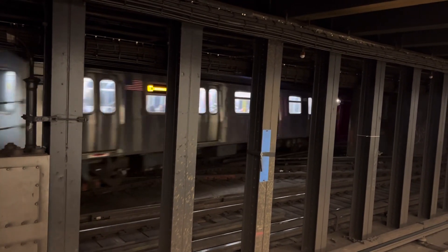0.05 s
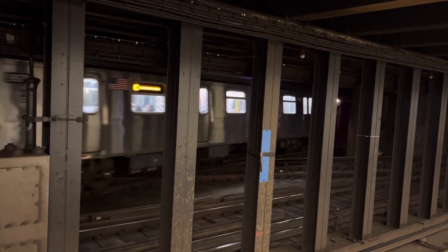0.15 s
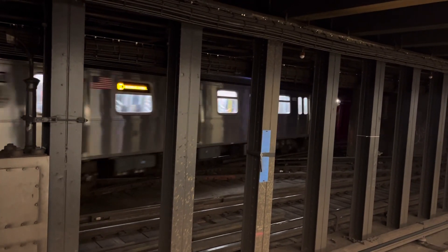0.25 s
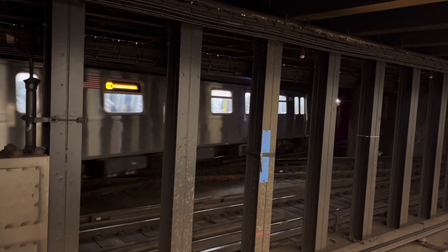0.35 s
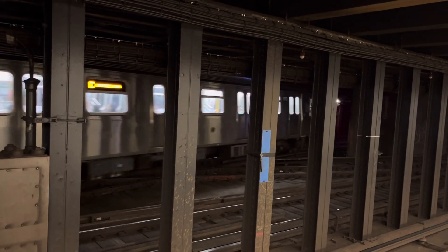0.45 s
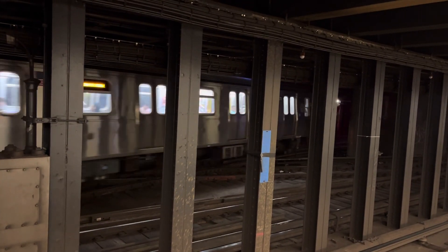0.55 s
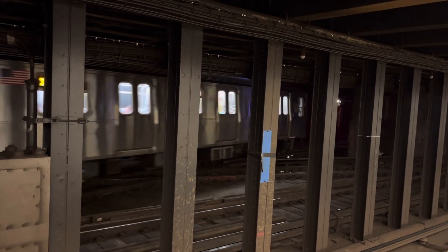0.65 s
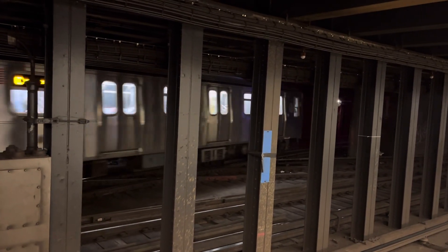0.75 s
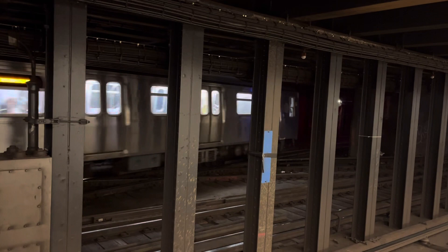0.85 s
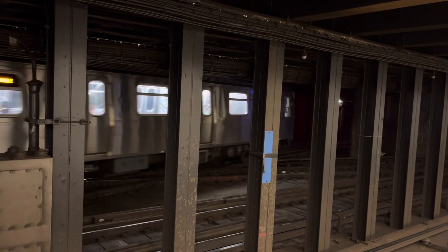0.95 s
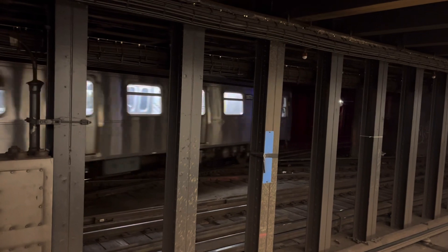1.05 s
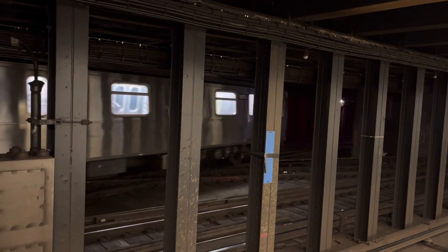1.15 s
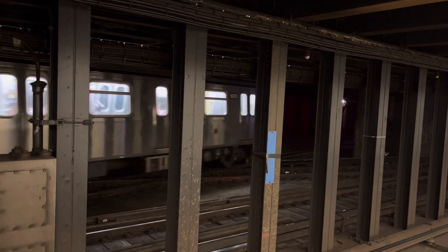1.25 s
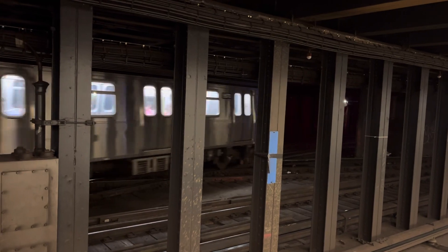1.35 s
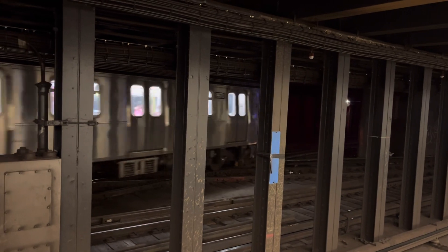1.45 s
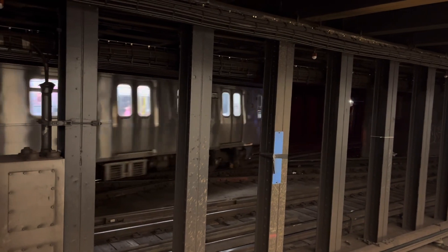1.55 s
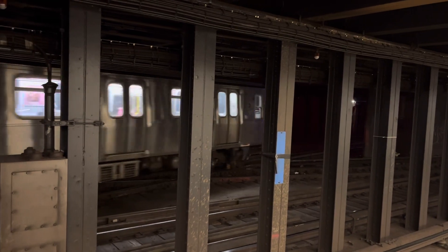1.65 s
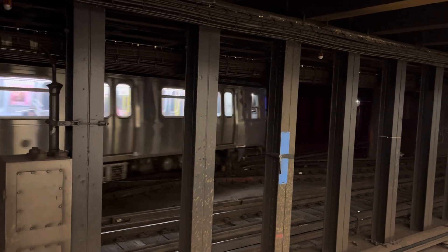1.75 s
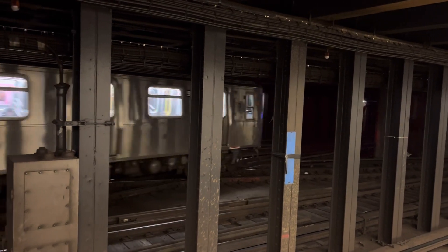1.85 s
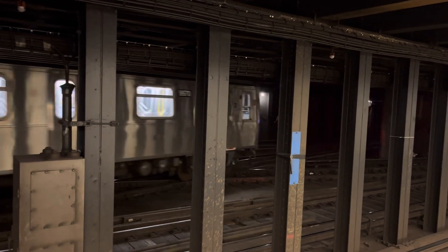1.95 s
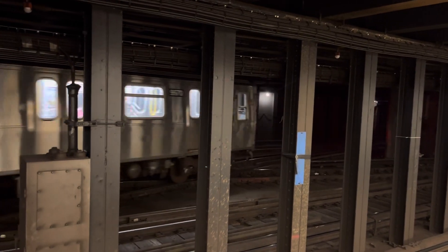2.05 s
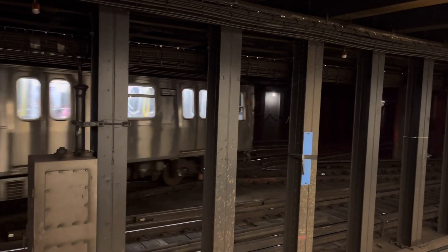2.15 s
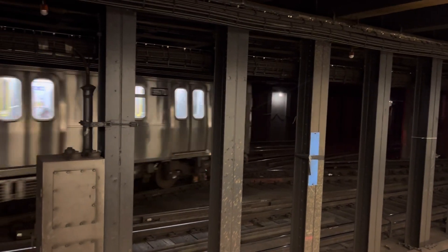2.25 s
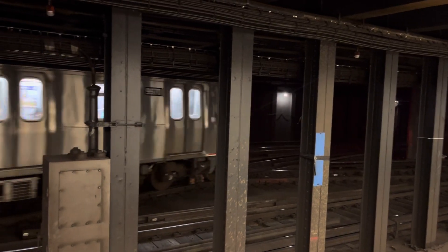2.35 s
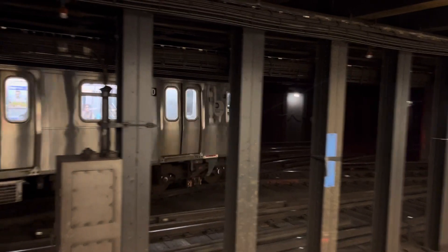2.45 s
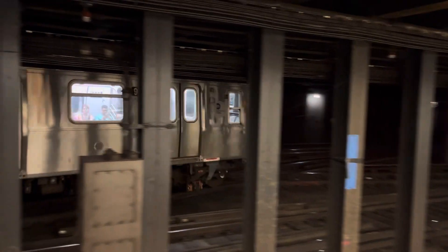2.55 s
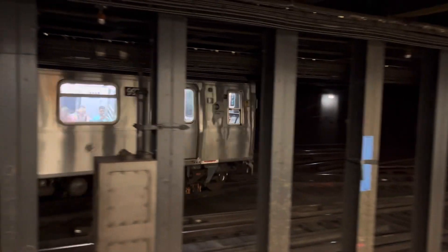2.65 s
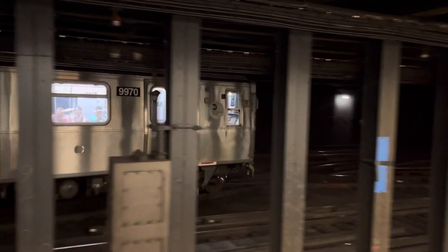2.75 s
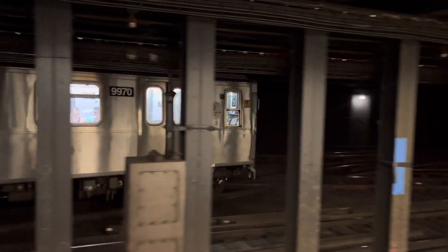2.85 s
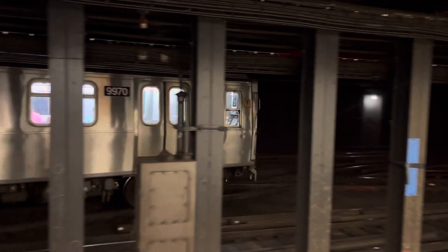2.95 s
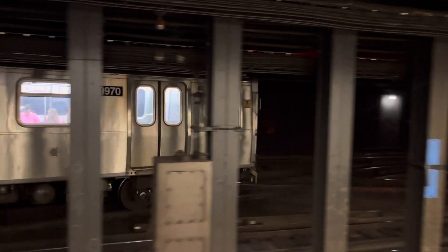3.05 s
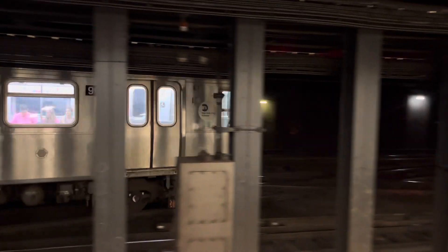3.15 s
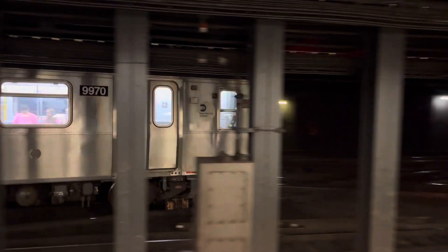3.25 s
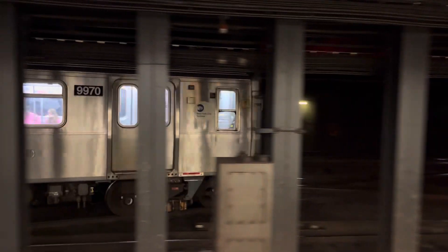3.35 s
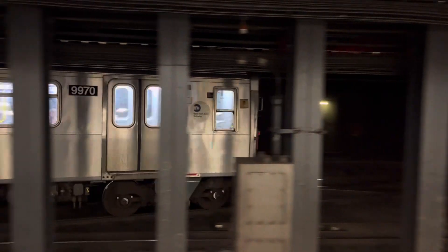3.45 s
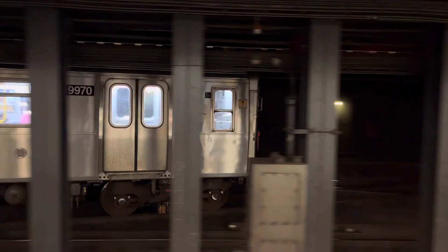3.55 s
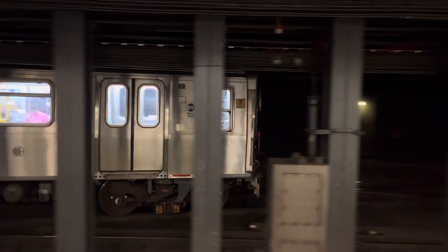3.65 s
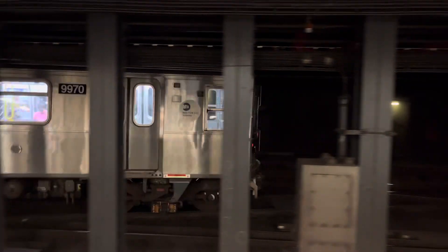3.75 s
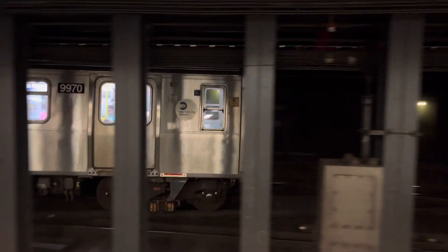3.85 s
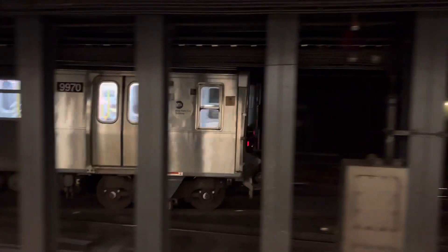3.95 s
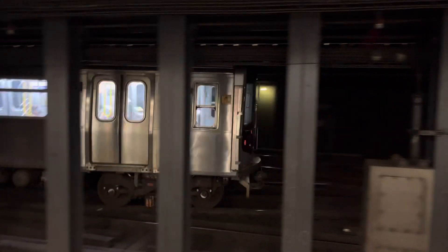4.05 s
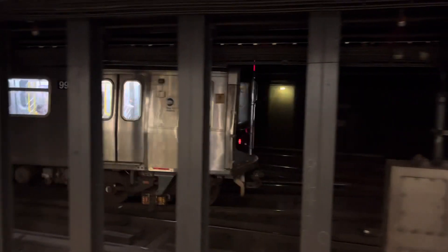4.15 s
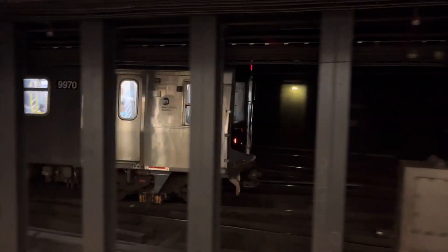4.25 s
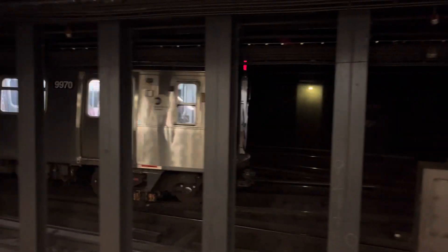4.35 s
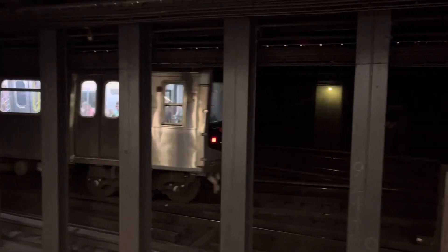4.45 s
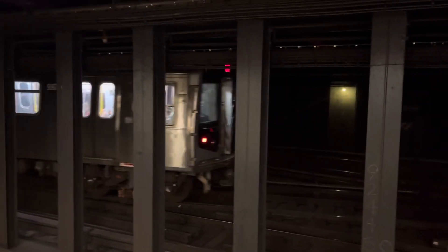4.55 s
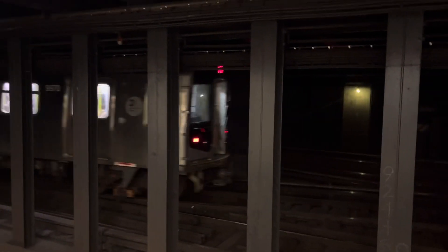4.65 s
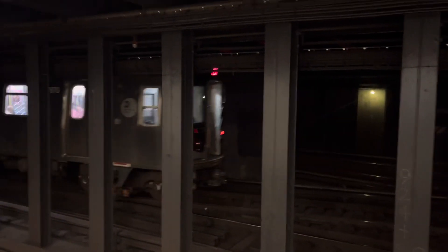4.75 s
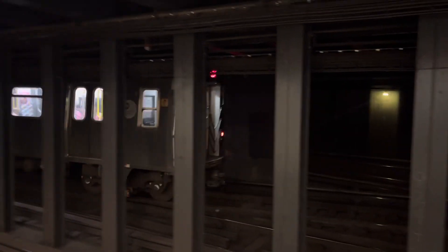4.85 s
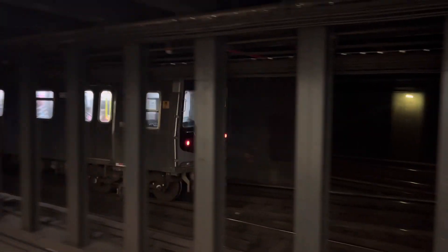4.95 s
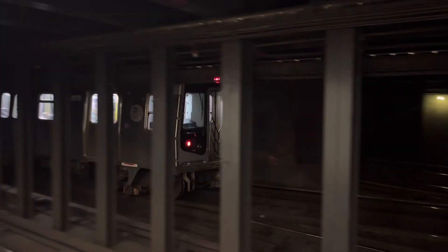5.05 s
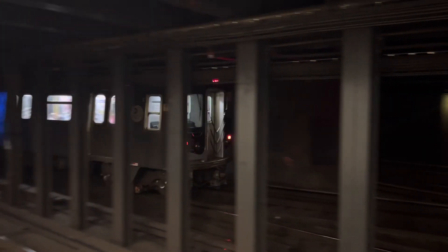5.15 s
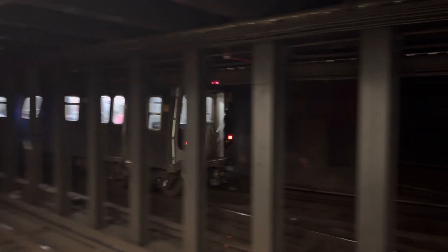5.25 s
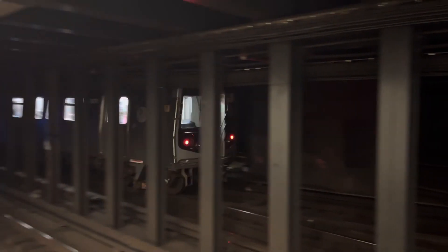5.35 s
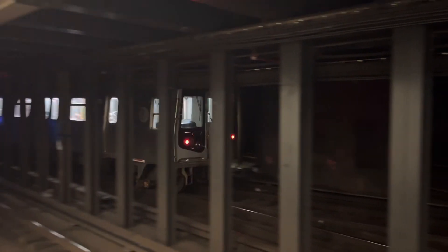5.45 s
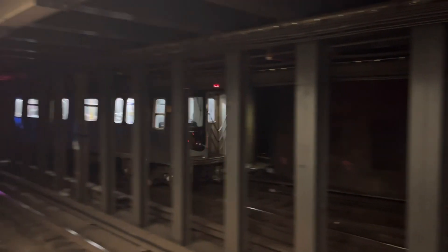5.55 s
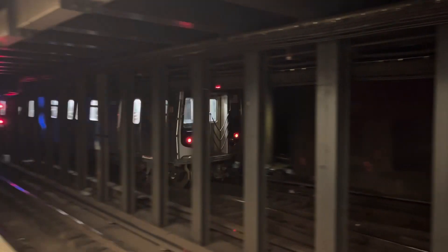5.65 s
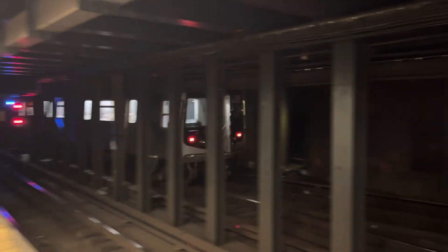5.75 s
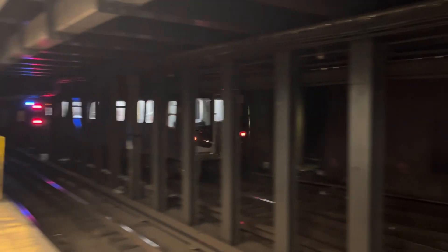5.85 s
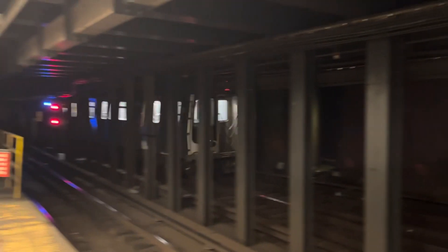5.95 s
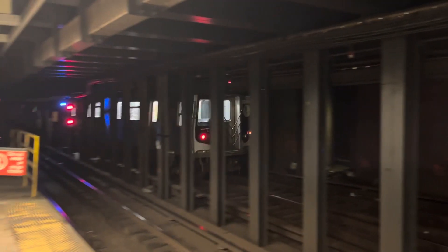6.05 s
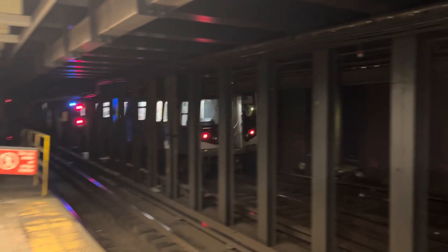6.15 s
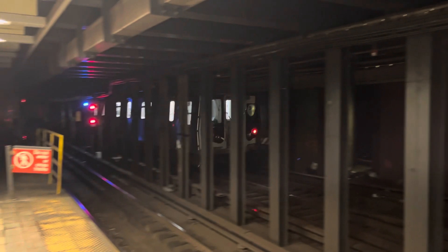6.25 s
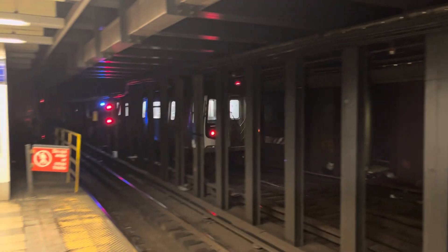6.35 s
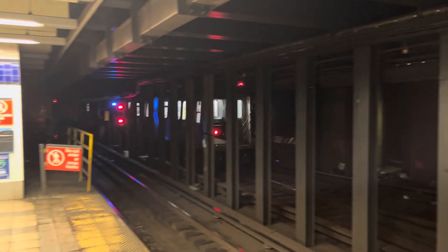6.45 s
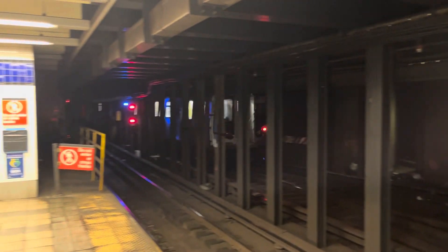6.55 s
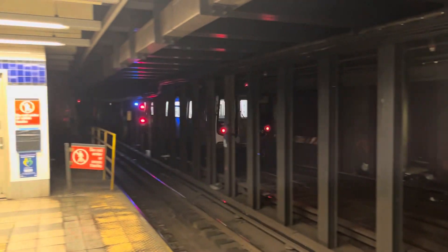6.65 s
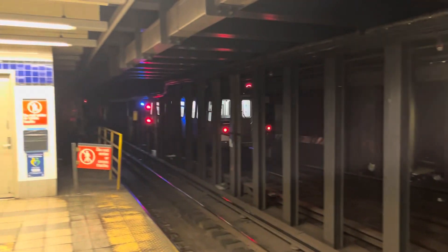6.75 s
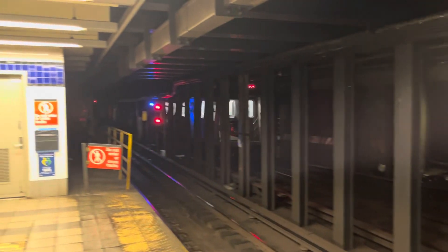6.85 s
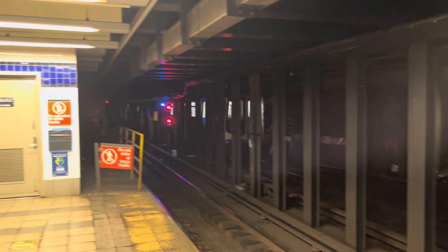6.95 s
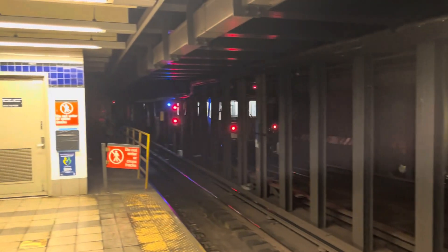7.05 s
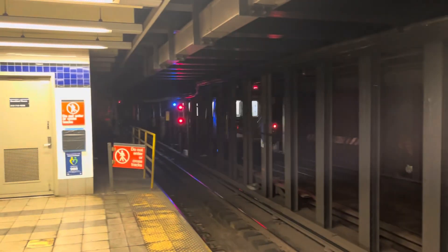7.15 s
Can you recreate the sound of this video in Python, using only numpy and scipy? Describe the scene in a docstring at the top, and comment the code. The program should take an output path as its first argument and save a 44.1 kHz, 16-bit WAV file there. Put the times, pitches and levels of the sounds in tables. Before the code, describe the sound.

A subway train is already rolling past the end of an underground platform, with a dense low roar, car-body rumble and grainy rail hiss. Beneath it sit a low electric hum with overtones, swelling as cars pass, and a faint fuzzy high motor whine. From 0.1 s wheels knock over rail joints; strong clanks land near 1.4, 1.9 and 2.4 s, each with a crack, steely ringing, loose-gear rattle and tunnel echo. A thin squeal sings from 2.4 to 3.1 s while deep thuds come around 2.8 s. Another clatter runs from 3.6 to 4.5 s, with several wavering flange squeals, clearest at 4.1 s. The last car then enters the tunnel: knocks at 4.8, 5.2 and 5.5 s are softer-edged and more distant, with a faint lower squeal after 5.5 s. Sparse dull thumps at 6.0 and 6.5 s remain as the muffled roar and hum recede until 7.2 s.

```python
"""Subway wheels roar on the rails and knock over joints and switch points as a train leaves a station.
Heard from the platform's end on two close microphone ports: the train rolls away into the tunnel, where
patchy noises make the roar, and noise bursts with ringing wheel modes make the knocks, smeared by echoes.
Flanges sing briefly in the curve as wavering tones, and loose gear taps under the cars. Behind them lie
the traction drive's whine, a blurred tone with sidebands, and a low electric hum with its overtones."""
import sys
import numpy as np
from scipy import signal
from scipy.fft import rfft, irfft, next_fast_len
from scipy.io import wavfile
from scipy.ndimage import uniform_filter1d

SR = 44100
rng = np.random.default_rng(int(sys.argv[2]) if len(sys.argv) > 2 else 0)


def materialize(psi):
    """Save the field psi as 16-bit PCM at rate SR to the path in sys.argv[1].

    A 1-D psi becomes a single channel; in a 2-D psi each row is a channel.
    """
    bounded = np.clip(np.atleast_2d(psi).T, -1, 1)
    quanta = np.round(bounded * 32767).astype(np.int16)
    wavfile.write(sys.argv[1], SR, quanta)


N = 317961
TIME = np.arange(N) / SR  # seconds

# pitch of the hum: first_hz, last_hz
HUM_PITCH = (113.9, 113.0)
# the humming unit under each car goes by: nearest_s, level_db
HUM_PASSES = [(0.52, -31), (1.0, -33.5), (2.382, -25), (3.298, -30), (3.78, -30), (4.2, -33)]
# time a unit takes to roll as far as it is distant; level of the hum that fills the station
PASS_S, STATION_HUM_DB = 0.081, -40.5
# the hum's octave: time_s, level_db
HUM_OCTAVE = [(0, -33.5), (3.4, -39.5), (4.0, -31.5), (4.6, -38), (6.0, -40), (6.3, -33), (6.65, -41.5),
              (6.95, -32.5)]
# higher partials of the hum: multiple, level_db (against the octave)
HUM_OVERTONES = [(3, -9.5), (4, -12.5), (5, -16)]
# traction drive: time_s, pitch_hz, level_db (pitch and level waver around these)
DRIVE_WHINE = [(0, 2874, -46), (2.2, 2830, -46), (3, 2877, -46.5), (5.1, 2834, -48), (5.65, 2790, -46.5),
               (7.2, 2847, -49)]
# flanges rubbing the rail: start_s, length_s, pitch_hz, level_db (before the swell)
FLANGE_SQUEALS = [(0.99, 0.04, 5028, -54), (1.335, 0.045, 4260, -42), (2.4, 0.75, 4016, -49),
                  (2.93, 0.08, 5674, -50), (3.73, 0.07, 7320, -47), (3.845, 0.08, 7320, -45),
                  (3.86, 0.25, 6200, -51), (3.7, 0.42, 5233, -53), (3.945, 0.15, 3822, -43),
                  (4.14, 0.34, 3868, -40), (4.114, 0.1, 4300, -44), (4.215, 0.11, 4320, -42),
                  (4.4, 0.28, 6050, -54), (5.53, 0.14, 3600, -50), (5.531, 0.7, 2700, -50),
                  (6.95, 0.45, 4230, -57)]

# loose gear under the cars: level against the blow, taps a second from all parts, time to the peak
CLATTER_DB, CLATTER_PER_S, CLATTER_PEAK_S = -20, 120, 0.024
# range in which its parts ring: lowest_hz, highest_hz
CLATTER_RANGE = (710, 6095)

# wheels striking rail joints: start_s, strength_db, weight_db (extra low clunk), crack_db (direct crack)
RAIL_JOINTS = [(0.1386, -22.5, -1, -6), (0.2242, -21, -0.5, 6), (0.558, -22, -1, -3),
               (0.7889, -28, -2.5, 12), (1.0989, -29, -0.5, 11), (1.432, -17.5, -3, 12),
               (1.5, -30.5, 6.5, 9), (1.734, -22.5, -10, 14), (1.9407, -16, 1, 10.5),
               (1.9791, -19.5, -3, 0), (2.338, -18.5, 1, 8), (2.368, -15, -10.5, 1), (2.4398, -24.5, 8, 12),
               (2.753, -38.5, 13.5, 4), (2.832, -36, 18, 1), (2.889, -21, -10, 12), (3.32, -39, 5, 2),
               (3.5978, -29, -7, 8), (3.706, -24.5, -5.5, -8), (3.85, -18.5, -20, -8),
               (4.114, -23, -2.5, 16), (4.125, -27, 1.5, 20), (4.4824, -29.5, -5, 18), (4.842, -38, 10, 16),
               (5.2437, -34, 8, 17), (5.532, -31.5, -3, 1), (5.688, -47, 14, -1), (6.049, -43.5, 15.5, 4),
               (6.454, -34.5, 10, 14)]
# colour of a blow on truck and rail: freq_hz, level_db
BLOW_COLOUR = [(35, -27), (100, 11.5), (330, 16), (520, 10.5), (1000, 5.5), (2600, -3.5), (4200, -8),
               (6000, -10.5), (8000, -25.5), (10000, -16.5), (12800, -22), (14500, -30)]
# ringing of a struck wheel: mode_hz, level_db (relative)
WHEEL_MODES = [(4016, 1.5), (5339, -13), (5717, -3), (7208, -1.5), (7330, -1), (8947, -25), (11526, -13),
               (12139, -5), (14363, -34)]
# how long the tunnel holds a blow: freq_hz, decay_s (to -60 dB)
TUNNEL_DECAY = [(500, 1.25), (2000, 0.81), (5000, 1.13), (12000, 0.46)]
# time over which a blow swells when it comes from deepest in the tunnel
SMEAR_S = 0.014

# how deep the train is in the tunnel: time_s, depth (0-1)
TUNNEL_DEPTH = [(3.4, 0.06), (5.6, 1)]
# the rolling under the blows: time_s, roar_db, hiss_db (before the trims below)
ROLLING_LEVEL = [(0.0, -24.5, -33), (0.38, -24.5, -33.5), (0.94, -30, -37), (1.44, -24, -34.5),
                 (1.59, -24, -30.5), (2.71, -23.5, -33), (3.45, -28, -38), (4.12, -27, -34),
                 (4.36, -26.5, -38), (7.21, -32.5, -39)]
ROAR_TRIM_DB, HISS_TRIM_DB = -0.03, 2.5
# each blow sets the car body booming: level against the blow, time to the peak
BOOM_DB, BOOM_PEAK_S = -7, 0.088
# car-body rumble: time_s, level_db
RUMBLE_LEVEL = [(0, -35), (0.25, -31), (0.6, -28), (0.9, -33.5), (1.4, -26), (2.1, -34), (2.9, -34),
                (3.15, -45), (3.9, -26), (4.3, -30.5), (5.1, -43), (6.35, -36), (7.2, -48)]
# colour of the car-body rumble: freq_hz, level_db (relative, per Hz)
RUMBLE_COLOUR = [(24, -31), (33, -13), (46, 4.5), (70, 11.5), (100, 3.5), (150, 3), (300, -48)]
# colour of the roar close by: freq_hz, level_db (relative, per Hz)
NEAR_ROAR_COLOUR = [(60, -15.5), (120, -12), (185, 4), (255, -4), (340, 0.5), (440, -4.5), (500, -9.5),
                    (700, -14), (1000, -20), (1600, -23.5), (3000, -31.5), (8000, -73)]
# colour of the roar from deep in the tunnel: freq_hz, level_db (relative, per Hz)
FAR_ROAR_COLOUR = [(70, -48), (105, -4), (160, -5), (210, -1), (300, -0.5), (380, -4.5), (450, -2.5),
                   (520, -13.5), (600, -9), (800, -15), (1200, -16), (1700, -23), (4000, -80.5)]
# colour of the rail hiss: freq_hz, level_db (relative, per Hz)
HISS_COLOUR = [(250, 4.5), (700, 4.5), (1000, 2), (1550, 1.5), (1800, -5), (2450, -6.5), (4200, -11.5),
               (5500, -19), (7000, -18.5), (8400, -43), (10300, -26.5), (12500, -33), (14500, -70)]

# the two microphone ports: freq_hz, likeness (0-1), left_lead_rad, left_minus_right_db
MIC_PORTS = [(100, .97, 0, -1), (350, .74, .3, -1), (600, .3, 1.2, 1.2), (950, .38, 1.6, 2.6),
             (1500, .1, 3.6, -2.5), (1800, .76, 6.6, 2.8), (3000, .62, 7.1, 2.8), (4600, .56, 6.7, 5.6),
             (6900, .55, 4.8, 1.4), (8300, .9, 3.1, 0), (9700, .65, 1.5, 0), (11000, .92, 0, 0)]
BAND_LIMIT_HZ = 14600


def gain_of(db):
    """Decibels to amplitude."""
    return 10 ** (np.asarray(db) / 20)


def evened(x):
    """Scales to rms 1."""
    return x / np.sqrt(np.mean(x ** 2) + 1e-20)


def read(points, hz):
    """Reads (Hz, value) points on a log-frequency axis."""
    f, value = np.transpose(points)
    return np.interp(np.log(hz + 1), np.log(f + 1), value)


def played(rows):
    """The columns of a time table at every sample."""
    s, *columns = np.transpose(rows)
    return [np.interp(TIME, s, c) for c in columns]


def add(mix, s, sound):
    """Mixes a two-channel sound in at time s."""
    part = mix[:, max(round(s * SR), 0):][:, :sound.shape[1]]
    part += sound[:, :part.shape[1]]


def wander(per_s, size):
    """Smooth random drift of rms 1, mostly slower than per_s cycles a second."""
    hz = np.fft.rfftfreq(next_fast_len(size + SR, True), 1 / SR)
    spectrum = np.exp(2j * np.pi * rng.random(len(hz))) / (1 + (hz / per_s) ** 4)
    return evened(irfft(spectrum))[:size]


def steady(hz):
    """A pure tone of rms 1 on a pitch curve, as it arrives by the direct path at two places."""
    phase = 2 * np.pi * (np.cumsum(hz) / SR + rng.random())
    return np.sqrt(2) * np.array([np.cos(phase), np.sin(phase)])


def tone(hz, width, size):
    """A line blurred by the many paths through the tunnel, different at two places."""
    turn = 2 * np.pi * np.cumsum(hz * np.ones(size)) / SR
    return np.array([wander(width, size) * np.cos(turn) + wander(width, size) * np.sin(turn)
                     for _ in range(2)])


def wash(colour, patchy_db, size):
    """Two noises of one colour, with patches that come and go as the wheels meet rough rail."""
    hz = np.fft.rfftfreq(size, 1 / SR)
    real, imag, patches = rng.standard_normal((3, 2, 4 * N // size + 6, len(hz)))
    # both noises share the patches, smoothed over time and then over frequency
    patches = uniform_filter1d(patches[0], size=10, axis=0)
    patches = evened(uniform_filter1d(patches, size=9, axis=1))
    z = (real + 1j * imag) * gain_of(read(colour, hz) + patchy_db * patches)
    noise = signal.istft(z.transpose(0, 2, 1), nperseg=size, noverlap=size * 3 // 4)[1]
    return evened(noise[:, :N])


def after_blows(peak_s):
    """Amplitude of the shaking that swells after each blow, more after a heavy one, and dies away."""
    power = np.zeros(N)
    for s, db, weight_db, _ in RAIL_JOINTS:
        age = np.maximum(TIME - s, 0) / peak_s
        power += (gain_of(db + weight_db) * age * np.exp(1 - age)) ** 2
    return np.sqrt(power)


def hum(base_width_hz=7, overtone_width_hz=3):
    """A sagging hum swells as each car passes and wavers with its echoes, under an octave and overtones."""
    passing = sum(gain_of(db) ** 2 / (1 + ((TIME - s) / PASS_S) ** 2) for s, db in HUM_PASSES)
    base_level = np.sqrt(passing + gain_of(STATION_HUM_DB) ** 2)
    octave_level = gain_of(played(HUM_OCTAVE)[0])
    hz = np.linspace(*HUM_PITCH, N)
    base = evened(steady(hz) + .5 * tone(hz, base_width_hz, N))
    upper = steady(2 * hz)
    for multiple, db in HUM_OVERTONES:
        partial_hz = round(multiple) * hz
        partial = steady(partial_hz) + tone(partial_hz, overtone_width_hz, N)
        upper = upper + gain_of(db) * evened(partial)
    return base_level * base + octave_level * upper


def whine(width_hz=32, waver_db=1.5, waver_hz=8, sideband_hz=57, sideband_db=-1.5):
    """The traction drive whines on a fuzzy tone between two sidebands that beat against it."""
    hz, db = played(DRIVE_WHINE)
    hz = hz + waver_hz * wander(7.6, N)
    sidebands = tone(hz - sideband_hz, width_hz, N) + tone(hz + sideband_hz, width_hz, N)
    note = evened(tone(hz, width_hz, N) + gain_of(sideband_db) * sidebands)
    return gain_of(db + waver_db * wander(28, N)) * note


def flanges(width_hz=14, scrape_width_hz=150, waver_hz=25, rough_db=-49, peak_at=0.071, linger_s=0.019):
    """A rubbing flange sings on one wheel mode: purer when loud, scraping when faint; the tunnel holds it."""
    out, t = np.zeros((2, N)), TIME[:2 * SR]
    keep = np.exp(-1 / (linger_s * SR))
    for s, length, hz, db in FLANGE_SQUEALS:
        # a quick rise to the peak (a fraction of the length), then a slow fall
        swell = np.sin(np.pi * np.interp(t / length, [0, peak_at, 1], [0, .5, 1]))
        power = signal.lfilter([1 - keep], [1, -keep], swell ** 2)
        scrape = min(gain_of(rough_db - db), 1)
        pitch = hz + scrape * waver_hz * wander(22.6, len(t))
        note = evened((1 - scrape) * 2 * steady(pitch) + tone(pitch, width_hz, len(t)))
        squeal = evened(note + scrape * tone(pitch, scrape_width_hz, len(t)))
        add(out, s, gain_of(db) * squeal * np.sqrt(power))
    return out


def clatter(part_t60=0.026, spread_db=-2.0, count=8):
    """Chains and brake rigging, shaken by each blow, tap unevenly; each part has its own short ring."""
    out, t = np.zeros((2, N)), TIME[:SR // 10]
    lowest, highest = CLATTER_RANGE
    for _ in range(count):
        struck = rng.random(N) < CLATTER_PER_S / count / SR
        taps = struck * gain_of(spread_db * np.minimum(rng.exponential(1, N), 2))
        hz = lowest * (highest / lowest) ** rng.random(size=(12, 1))
        modes = np.sin(2 * np.pi * (hz * t + rng.random((2, len(hz), 1)))) / np.sqrt(hz)
        part_ring = modes.sum(1) * gain_of(-60 * t / part_t60)
        out += signal.oaconvolve(taps[None], part_ring, axes=1)[:, :N]
    return gain_of(CLATTER_DB) * after_blows(CLATTER_PEAK_S) * evened(out)


def clang(weight_db, crack_db, crack_s=0.007, build_s=0.012, boom_s=0.011, rattle=0.18):
    """One wheel drops into a joint: a crack, then the tunnel's answer, with loose gear rattling."""
    hz, t, z = signal.stft(rng.standard_normal((2, SR + SR // 4)), SR, nperseg=512)
    # a heavy blow adds lows and mids
    colour_db = read(BLOW_COLOUR, hz) + weight_db / (1 + (hz / 6000) ** 2)
    # crowded steel modes ripple the treble
    colour_db = colour_db + 3.5 * hz / (hz + 6000) * rng.standard_normal(len(hz))
    dying = gain_of(-60 * t / read(TUNNEL_DECAY, hz)[:, None])
    # the bass fills the tunnel last
    boom = 1 - np.exp(-(t + 0.0052) * (1 + (hz[:, None] / 700) ** 2) / boom_s)
    sound = signal.istft(z * gain_of(colour_db)[:, None] * dying * boom, SR, nperseg=512)[1]
    t = np.arange(sound.shape[1]) / SR
    crack = gain_of(crack_db) * np.exp(-t / crack_s) * (1 - np.exp(-t / 0.003))
    echoes = 1 - np.exp(-t / build_s)
    return sound * np.hypot(crack, echoes) * np.exp(rattle * wander(22, len(t)))


def ring(ring_db=-16, ring_t60=0.65, width_hz=14, build_s=0.088):
    """The struck wheel rings; each one is worn a little differently and is hit at another spot."""
    mode_hz, mode_db = np.transpose(WHEEL_MODES)
    detune, uneven = rng.standard_normal((2, len(WHEEL_MODES)))
    hz, t = np.fft.rfftfreq(SR, 1 / SR), TIME[:SR]
    modes = zip(mode_hz * (1 + 0.0016 * detune), mode_db + 2 * uneven)
    lines = sum(gain_of(db) / (1 + ((hz - f) / width_hz) ** 2) for f, db in modes)
    sound = evened(irfft(lines * np.exp(2j * np.pi * rng.random((2, len(hz))))))
    return sound * (1 - np.exp(-t / build_s)) * gain_of(ring_db - 60 * t / ring_t60)


def joints():
    """Axle after axle crosses the gaps in the rails, softer-edged as the tunnel takes the train."""
    out = np.zeros((2, N))
    for s, db, weight_db, crack_db in RAIL_JOINTS:
        blow = clang(weight_db, crack_db)
        depth = np.interp(s, *np.transpose(TUNNEL_DEPTH))
        swell_s = SMEAR_S * np.sqrt(max(depth, 1 / SR))
        swell = 1 - np.exp(-TIME[:blow.shape[1]] / swell_s)
        add(out, s, gain_of(db) * blow * swell)
        add(out, s, gain_of(db) * ring())
    return out


def rolling():
    """Rough steel on steel shakes the car bodies, the wheels and the rails."""
    roar_db, hiss_db = played(ROLLING_LEVEL)
    depth = np.clip(played(TUNNEL_DEPTH)[0], 0, 1)
    rumble = gain_of(played(RUMBLE_LEVEL)[0]) * wash(RUMBLE_COLOUR, patchy_db=1.2, size=4096)
    # the tunnel mouth recolours the roar as the last car goes in
    near = wash(NEAR_ROAR_COLOUR, patchy_db=1.0, size=2048)
    far = wash(FAR_ROAR_COLOUR, patchy_db=1.0, size=2048) * gain_of(1.3 * wander(14, N))
    boom = (1 - depth) * gain_of(BOOM_DB) * after_blows(BOOM_PEAK_S)
    level = np.hypot(gain_of(roar_db + ROAR_TRIM_DB), boom)
    roar = level * (np.sqrt(1 - depth) * near + np.sqrt(depth) * far)
    hiss_level = gain_of(hiss_db + HISS_TRIM_DB + 0.86 * wander(9.7, N))
    hiss = hiss_level * wash(HISS_COLOUR, patchy_db=2.0, size=1024)
    return rumble + roar + hiss


def ports(field):
    """Two unrelated sound fields reach two close ports: alike in the bass, shifted and shaded higher up."""
    size = next_fast_len(N + 4096, True)
    hz, table = np.fft.rfftfreq(size, 1 / SR), np.array(MIC_PORTS)
    same, lead, balance_db = (read(np.c_[table[:, 0], column], hz) for column in table.T[1:])
    same = np.clip(same, 0, 1)
    left, other = rfft(field, size)
    right = (same * left + np.sqrt(1 - same ** 2) * other) * np.exp(-1j * lead)
    both = np.array([left * gain_of(balance_db / 2), right * gain_of(-balance_db / 2)])
    return irfft(both, size)[:, :N]


def scene():
    """The whole train, from the background up, at the microphone on the platform's end."""
    return ports(hum() + whine() + flanges() + clatter() + joints() + rolling())


def record(dry):
    """The microphone sheds the deepest bass; then the recorder's band limit."""
    thinned = signal.sosfilt(signal.butter(4, 38, "high", fs=SR, output="sos"), dry)
    band_limit = signal.firwin(511, BAND_LIMIT_HZ, window=("kaiser", 9), fs=SR)
    return signal.oaconvolve(thinned, band_limit[None], "same")


dry = scene()
out = record(dry)
materialize(out)
```